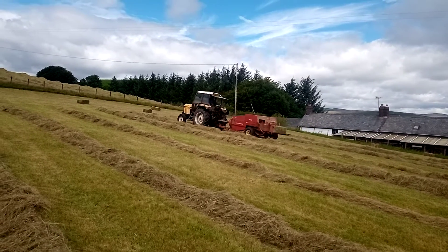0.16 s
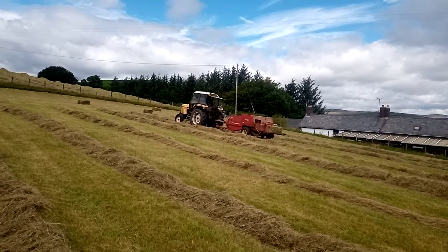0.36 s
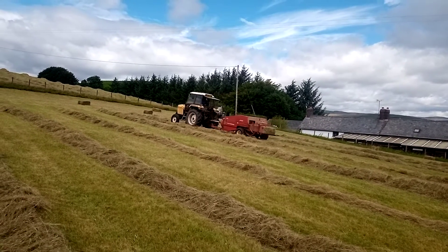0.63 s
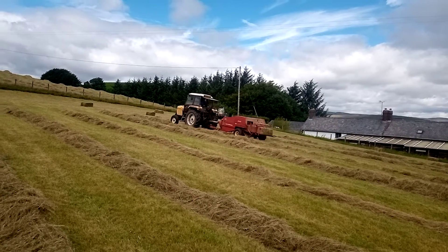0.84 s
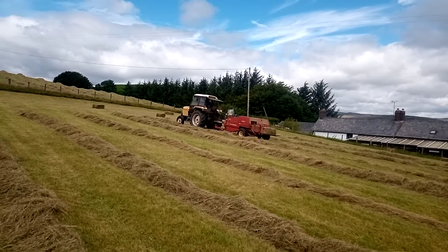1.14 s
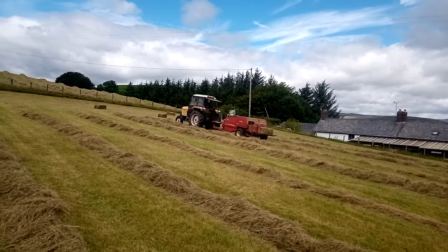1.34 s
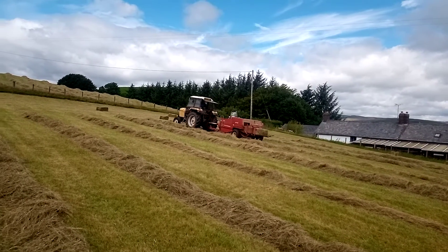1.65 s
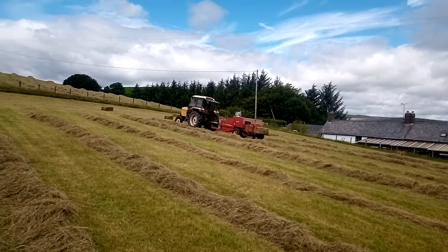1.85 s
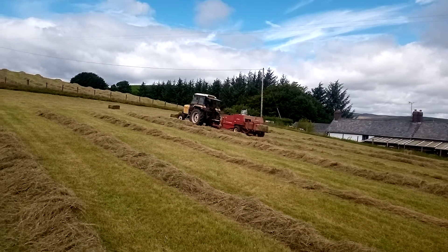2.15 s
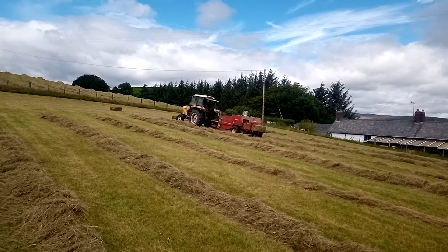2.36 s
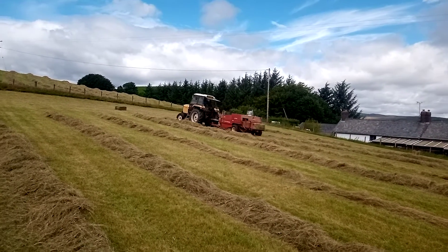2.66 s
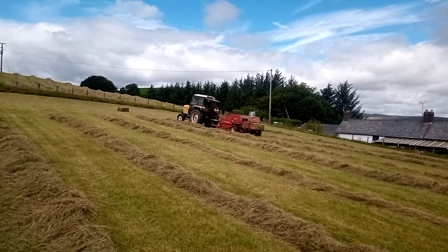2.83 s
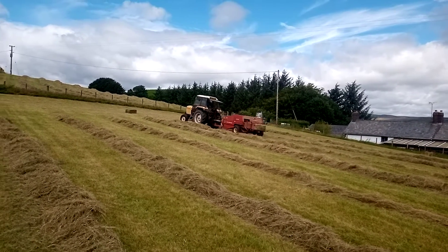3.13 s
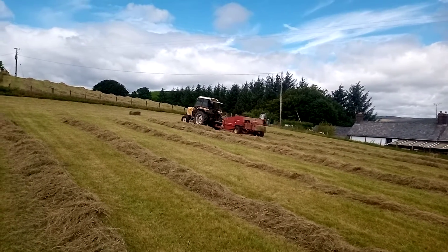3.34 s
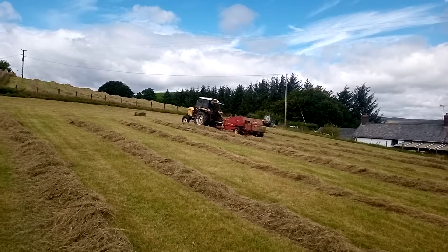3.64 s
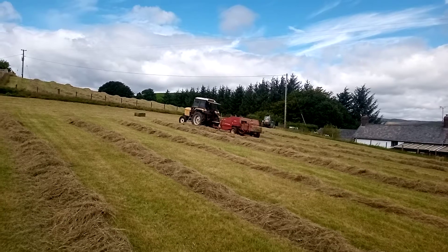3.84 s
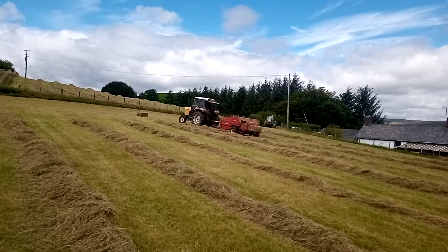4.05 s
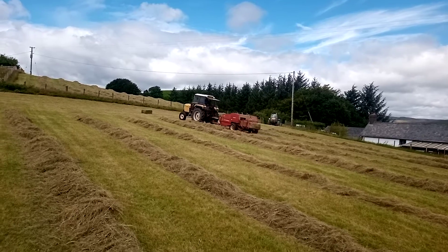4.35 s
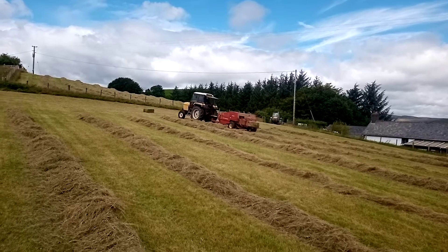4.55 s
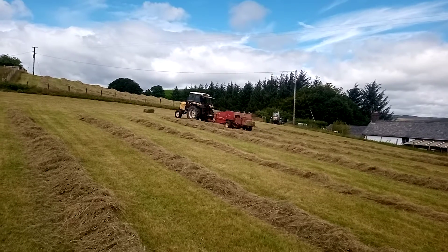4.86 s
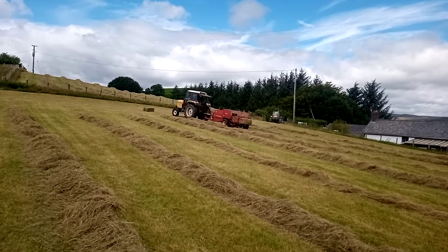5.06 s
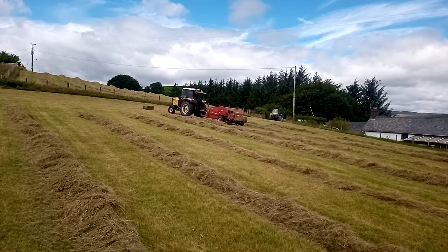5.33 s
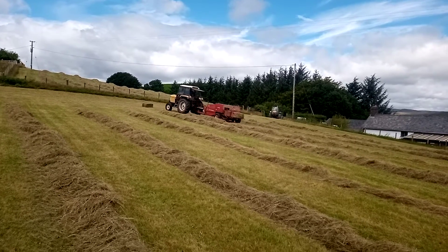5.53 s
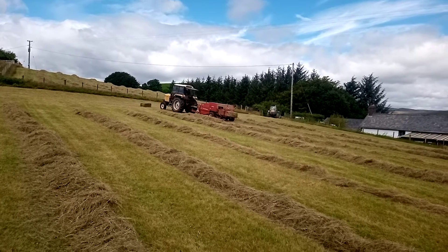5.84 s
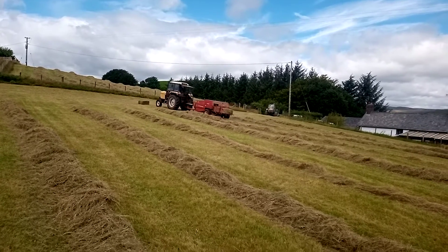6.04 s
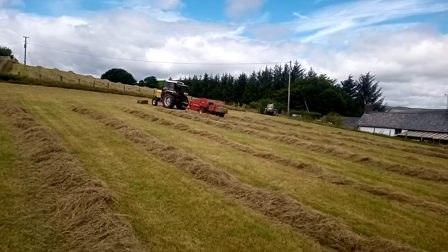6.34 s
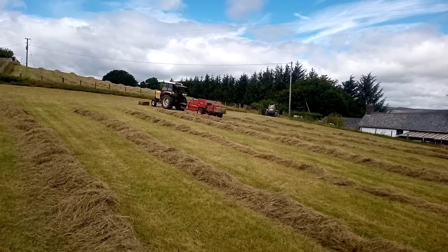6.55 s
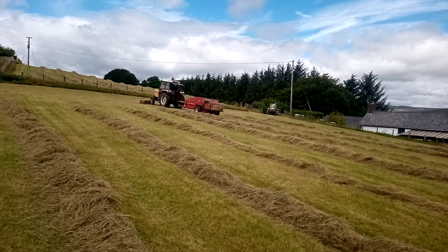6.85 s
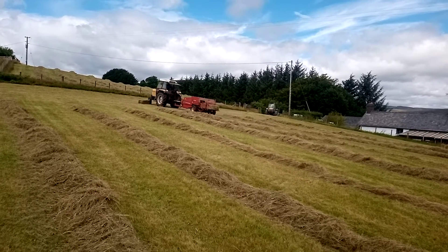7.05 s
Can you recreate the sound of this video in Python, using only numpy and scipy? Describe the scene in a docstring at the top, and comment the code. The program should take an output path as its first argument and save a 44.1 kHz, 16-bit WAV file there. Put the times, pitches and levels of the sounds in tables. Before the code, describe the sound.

Out in a hay field, a baler beats out an even rhythm of metal clanks, with chains jingling and dry stalks crackling in between, over the drone of the diesel tractor towing it. The machines are at a moderate distance and slowly draw away. Soft wind rumbles close on the microphone throughout; late on, after a brief bearing squeak, a strong gust buffets it and dies down.

```python
"""From the start, a four-cylinder diesel tractor hums across a hay field in a light breeze, pulling a
square baler whose tines and chains rattle its steel casing. About every 0.73 s the plunger clanks and
drags the engine down a little; the packer forks then sweep hay in and swing back with a bright clash.
At 4.6 s a dry bearing squeaks. From 5.3 to 6.7 s one strong gust buffets the microphone.
By the end the patter and the top end have faded a little as the baler slowly draws away."""
import sys
import numpy as np
from scipy import signal
from scipy.fft import rfft, irfft
from scipy.io import wavfile
from scipy.ndimage import uniform_filter1d

SR = 44100
rng = np.random.default_rng(int(sys.argv[2]) if len(sys.argv) > 2 else 0)


def store_wav(level_fs):
    """Save 16-bit WAV to argv[1]."""
    pcm = np.round(np.clip(np.atleast_2d(level_fs), -1, 1) * 32767)
    wavfile.write(sys.argv[1], SR, pcm.T.astype(np.int16))


N = 317079
TIME = np.arange(N) / SR


def undb(db):
    """Decibels to gain."""
    return 10 ** (np.asarray(db) / 20)


def unit(x):
    """Scale to rms 1."""
    return x / np.sqrt(np.mean(x ** 2))


def curve(table):
    """Automation lane: rows (t/s, value) joined by straight lines."""
    return np.interp(TIME, *np.transpose(table))


def swell(middle, half_length):
    """Bell-shaped envelope that peaks at 1."""
    return np.exp(-((TIME - middle) / half_length) ** 2)


def since(start):
    """Seconds since start, 0 before it."""
    return np.maximum(TIME - start, 0)


def noise():
    """White noise."""
    return rng.standard_normal(N)


def wander(rate):
    """Random modulator of rms 1, changing about rate times a second."""
    size = max(int(SR / rate), 2)
    steps = np.repeat(rng.standard_normal(N // size + 1), size)[:N]
    return unit(uniform_filter1d(steps, size))


def grainy_noise(depth_db, rate):
    """Noise of rms 1 whose level flickers about rate times a second."""
    return unit(noise() * undb(depth_db * wander(rate)))


def colour(x, points):
    """Minimum-phase EQ through points (f/Hz, level/dB); white noise keeps its level."""
    size = 8192
    hz, db = np.transpose(points)
    bin_hz = np.arange(size // 2 + 1) * SR / size
    log_gain = np.log(undb(np.interp(np.log(bin_hz + 1), np.log(hz), db)))
    cepstrum = irfft(log_gain)[:size // 2]
    cepstrum[1:] *= 2
    response = irfft(np.exp(rfft(cepstrum, size)))
    return signal.fftconvolve(x, response / np.linalg.norm(response))[:N]


def ring(x, modes):
    """Bank of steep resonators (f/Hz, width/Hz, level/dB); white noise keeps its level."""
    out, power = 0, 0
    for hz, width, db in modes:
        b, a = signal.iirpeak(hz, hz / width, fs=SR)
        out = out + undb(db) * signal.lfilter(b, a, signal.lfilter(b, a, x))
        power += undb(db) ** 2 * np.pi * width / 2 / SR
    return out / np.sqrt(power)


# wind strength: a light breeze, then one long gust (t/s, level/dB)
WIND_STRENGTH = [(0, -33.5), (.45, -38), (.75, -41.5), (1.1, -40), (1.45, -46.5), (2.02, -37),
                 (2.65, -40.5), (2.95, -46.5), (3.6, -36), (3.85, -41), (4.48, -46.5), (4.75, -33),
                 (5.08, -41), (5.2, -40), (5.33, -22.5), (5.72, -24), (6.1, -27), (6.7, -27.5), (6.82, -39),
                 (7.19, -31.5)]
# short surges on top of that strength (t/s, half length/s, added level/dB)
WIND_SURGES = [(0.09, 0.042, 3), (0.269, .045, 9.5), (0.547, 0.084, 5.5), (1.68, 0.035, 3.5),
               (2.12, 0.042, 6.5), (2.66, 0.05, 5.5), (3.166, 0.017, 15.5), (4.614, 0.0088, 8),
               (4.722, 0.015, 8.5), (4.87, .02, 5.5), (5.148, 0.024, 14.5), (6.004, 0.057, 5.5),
               (6.524, 0.011, 3.5), (6.94, 0.025, 9)]
# EQ of the breeze's low rumble (f/Hz, level/dB)
RUMBLE_EQ = [(20, -14.5), (35, -28), (55, -8.5), (90, 1), (160, -1), (230, -6.5), (320, -19), (500, -59),
             (1000, -65.5), (8000, -110)]
# EQ of the rougher turbulence in a gust (f/Hz, level/dB)
TURBULENCE_EQ = [(25, -29), (60, -5), (120, 3.5), (200, 2), (340, -1), (480, -9), (700, -17), (1100, -28),
                 (2000, -35.5), (12000, -100)]
# single eddies that slap the microphone (t/s, width/s, peak level/dB)
EDDY_SLAPS = [(5.265, 0.0011, -14.5), (5.329, 0.00034, -17), (5.569, 0.00035, -23), (5.918, 0.0017, -17),
              (5.963, 0.00074, -12)]


def wind(gust_db=-28):
    """Eddies rumble on the microphone; stronger wind breaks into smaller, brighter buffets."""
    surges_db = sum(db * swell(when, half_length) for when, half_length, db in WIND_SURGES)
    strength_db = curve(WIND_STRENGTH) + surges_db - gust_db
    rumble = colour(grainy_noise(depth_db=1.5, rate=30), RUMBLE_EQ)
    buffets = colour(grainy_noise(depth_db=3, rate=110), TURBULENCE_EQ)
    slaps = 0
    for when, width, db in EDDY_SLAPS:
        # one pressure peak between two shallow troughs
        phase = (TIME - when) / width
        slaps = slaps + undb(db) * (1 - phase ** 2) * np.exp(-phase ** 2 / 2)
    return rumble * undb(-28.5 + 0.56 * strength_db) + buffets * undb(-29 + 1.56 * strength_db) + slaps


# governed firing rate of the engine (t/s, f/Hz)
GOVERNED_RATE = [(0, 63.4), (.8, 64.51), (1.55, 63.65), (2.2, 62.75), (2.95, 62.74), (3.5, 62.95),
                 (4.4, 62.7), (5.2, 63.44), (6, 62.8), (7.19, 63.17)]


def firing_rate(sag_hz=0.55, deepest_after_s=0.11):
    """Each plunger stroke loads the engine, and the governor pulls the pitch back up."""
    ages = (since(start) / deepest_after_s for start, *_ in PLUNGER_STROKES)
    load = sum(age * np.exp(1 - age) for age in ages)
    return curve(GOVERNED_RATE) - sag_hz * load


def crank_tones(firings, partials, waver_db, waver_rate, drift_cycles):
    """Partials locked to the crankshaft; moving air makes each waver in level and phase."""
    out = 0
    for multiple, db in partials:
        cycles = multiple * firings + rng.random() + drift_cycles * wander(waver_rate)
        waver = undb(waver_db * wander(waver_rate))
        out = out + undb(db) * unit(np.sin(2 * np.pi * cycles) * waver)
    return out


# partials of the exhaust hum (multiple of the firing rate, level/dB)
EXHAUST_PARTIALS = [(1, -9.5), (1.5, -33), (2, -0.5), (2.5, -15), (3, -17.5), (3.5, -17), (4, -21.5)]
# fader ride on that hum (t/s, level/dB)
EXHAUST_RIDE = [(0, -33.5), (1.2, -35), (2.3, -35.5), (2.7, -31.5), (3.25, -42.5), (4.1, -34), (4.35, -42),
                (4.9, -32), (5.15, -42.5), (6.2, -44.5), (6.75, -33.5), (7.19, -37.5)]
# partials of the block's drone (multiple of the firing rate, level/dB)
DRONE_PARTIALS = [(10, -56.5), (11, -58), (12, -56.5)]
# engine block resonances (f/Hz, width/Hz, level/dB)
BLOCK_MODES = [(694, 181, 5), (762, 65, -3), (986, 155, 4.5), (1860, 680, -4.5)]


def engine(pulse_db=-51, knock_db=-45, knock_decay_cycles=0.91):
    """Each firing thumps the exhaust and rings the block with a rasp of diesel knock."""
    firings = np.cumsum(firing_rate() * (1 + 0.00218 * wander(30))) / SR
    count = firings.astype(int)
    cylinder_db = np.array([0.38, 0, 0.11, -0.28])
    force = undb(cylinder_db[count % 4])
    pulses = np.diff(count, prepend=0) * force
    knock = noise() * force * np.exp(-(firings % 1) / knock_decay_cycles)
    block = ring(undb(pulse_db) * unit(pulses) + undb(knock_db) * unit(knock), BLOCK_MODES)
    hum = crank_tones(firings, EXHAUST_PARTIALS, waver_db=2, waver_rate=18, drift_cycles=0.088)
    drone = crank_tones(firings, DRONE_PARTIALS, waver_db=3.5, waver_rate=11, drift_cycles=0.14)
    return hum * undb(curve(EXHAUST_RIDE)) + drone + block * undb(wander(5.026))


# squeaks of a dry bearing (t/s, length/s, f/Hz, level/dB)
BEARING_SQUEAKS = [(4.624, 0.098, 6040, -51), (4.666, 0.033, 6100, -48), (4.672, .024, 5480, -47)]


def bearing(pitch_wobble=0.0104):
    """Steel rubs on dry steel in brief, unsteady whistles."""
    out = 0
    for start, length, hz, db in BEARING_SQUEAKS:
        arch = np.sin(np.pi * np.clip((TIME - start) / length, 0, 1))
        cycles = np.cumsum(hz * (1 + pitch_wobble * wander(600))) / SR
        out = out + undb(db) * arch * unit(np.sin(2 * np.pi * cycles))
    return out


# ringing modes of the chain links, plus the microphone's high ring near 15 kHz
# (f/Hz, width/Hz, level/dB)
JINGLE_MODES = [(3740, 116, 4), (5024, 100, -1.5), (5660, 130, -4), (6070, 69, 1.5), (6680, 210, -5.5),
                (7220, 120, -14.5), (8550, 72, -15.5), (9040, 130, -18), (9640, 170, -16.5),
                (10480, 210, -19.5), (14707, 260, -23), (15250, 300, -20)]


def jingle(envelope, spread_db=7):
    """Chain links clink: many small touches and a few hard ones ring the same modes."""
    touches = unit(noise() * undb(spread_db * np.clip(wander(250), -2, 2)))
    return ring(touches * envelope, JINGLE_MODES)


# EQ of hay scraping steel, with the microphone's thin resonance near 15 kHz (f/Hz, level/dB)
SCRAPE_EQ = [(300, -21), (700, 6.5), (1200, -14), (2200, 1.5), (3500, -3), (6000, -4.5), (7000, -4),
             (8000, -12.5), (10000, -16.5), (11800, -26.5), (13800, -31), (14900, -14), (16000, -25.5)]


def scrape(excitation):
    """Hay rubs on steel with a broad, dry tone; the microphone adds a thin ring on top."""
    return colour(excitation, SCRAPE_EQ)


# resonances of the baler's steel casing (f/Hz, width/Hz, level/dB)
CASING_MODES = [(973, 207, 0.5), (1423, 133, -0.5), (1776, 131, 2.5), (2010, 380, 5), (2600, 600, 0),
                (3097, 220, -4.5), (3782, 144, -5.5), (4230, 73, -7.5), (4850, 330, -9), (5380, 270, -11.5),
                (6040, 330, -10.5), (6490, 310, -10.5)]


def casing(excitation):
    """The steel casing rings with whatever rattles against it."""
    return ring(excitation, CASING_MODES)


def tine_ticks(envelope, per_s=45, decay_s=0.0035, spread_db=3):
    """Single tines flick the pickup bands at random: short dry ticks of uneven size."""
    flicks = (rng.random(N) < per_s / SR) * undb(spread_db * np.clip(noise(), -2, 2))
    bursts = signal.lfilter([1], [1, -np.exp(-1 / (decay_s * SR))], flicks)
    return scrape(unit(noise() * bursts) * envelope)


# rattles on every turn of the flywheel (t/s from the plunger's impact, half length/s, level/dB)
FLYWHEEL_RATTLES = [(-.138, 0.016, -55), (-.025, 0.045, -56.5), (.025, .03, -48), (.135, 0.0073, -46.5)]


def feeder_envelope(pickup_db=-49.5, fade_db_per_s=0.62, packer_delay_s=0.21, packer_half_s=0.047):
    """Pickup patter fades with distance; each stroke adds rattles and a sweep as big as its wad of hay."""
    power = undb(pickup_db - fade_db_per_s * TIME) ** 2
    for start, _, _, _, packer_db, *_ in PLUNGER_STROKES:
        for delay, half_length, db in [*FLYWHEEL_RATTLES, (packer_delay_s, packer_half_s, packer_db)]:
            power = power + undb(db) ** 2 * swell(start + delay, half_length)
    return np.sqrt(power)


def feeder():
    """Tines and chains patter on the casing while dry stalks crackle through the chute."""
    effort = feeder_envelope() * undb(0.43 * wander(45))
    tines = undb(5.5) * effort * grainy_noise(depth_db=3, rate=900)
    stalks = undb(-4) * effort * grainy_noise(depth_db=1, rate=220)
    chains = undb(-49) * grainy_noise(depth_db=3, rate=300)
    clinks = undb(-8) * jingle(effort)
    ticks = undb(-9) * tine_ticks(effort)
    return casing(tines + chains) + scrape(stalks) + clinks + ticks


def fork_sweep(delay_s=0.25, half_length_s=0.04, lowpass_hz=3200):
    """Once a stroke the packer forks push hay into the chamber: a duller swell of rattling."""
    envelope = sum(swell(start + delay_s, half_length_s) for start, *_ in PLUNGER_STROKES)
    rattle = casing(noise() * envelope)
    return undb(-41) * signal.lfilter(*signal.butter(2, lowpass_hz, fs=SR), rattle)


def fork_return(attack_s=0.016, release_s=0.04, highpass_hz=2500):
    """Half a stroke after the impact the forks swing back with a bright, jingling clash."""
    envelope = 0
    for start, *_, delay, db in PLUNGER_STROKES:
        age = since(start + delay)
        envelope = envelope + undb(db) * (1 - np.exp(-age / attack_s)) * np.exp(-age / release_s)
    chatter = envelope * unit(undb(3 * wander(400)))
    sizzle = signal.lfilter(*signal.butter(1, highpass_hz, "high", fs=SR), scrape(noise() * chatter))
    return undb(4) * casing(noise() * chatter) + undb(5.5) * sizzle + undb(-2) * jingle(envelope)


# resonances of the bale chamber's heavy frame (f/Hz, width/Hz, level/dB)
FRAME_MODES = [(1801, 68, 2), (1920, 51, 5), (2583, 74, 1.5), (2680, 145, 0), (3084, 110, -2.5),
               (3770, 190, -11)]
# plunger strokes, which also cue the forks, feeder and engine sag (t/s, impact level/dB,
# rebound level/dB, treble trim/dB, packer level/dB, fork return delay/s, fork return level/dB)
PLUNGER_STROKES = [(0.225, -29.5, -29, -0.5, -48.5, 0.36, -38), (0.956, -28.5, -36.5, -3, -52, 0.36, -44),
                   (1.689, -27.5, -26, -2, -43.5, 0.39, -44), (2.424, -26, -31.5, -3.5, -45, 0.38, -46),
                   (3.163, -25, -33, -5.5, -46, 0.38, -46), (3.896, -28.5, -30, -10, -46.5, 0.37, -45),
                   (4.623, -29, -34, -1, -51, 0.38, -47), (5.369, -32, -48, 0.5, -46.5, 0.34, -43.5),
                   (6.099, -27, -28, -3.5, -45.5, .356, -38.5), (6.842, -29, -28.5, -2.5, -44.5, 1, -50)]


def plunger(rebound_s=0.01896, settle_s=0.0406, attack_s=0.0012, crack_s=0.0065, rattle_s=0.022):
    """The plunger hits, its linkage rebounds, then settles: three knocks ring the frame and casing."""
    body_power, treble_power = np.zeros(N), np.zeros(N)  # overlapping knocks add in power
    for start, impact_db, rebound_db, treble_db, *_ in PLUNGER_STROKES:
        knocks = [(0, impact_db, treble_db),
                  (rebound_s, rebound_db, treble_db - 3),
                  (settle_s, impact_db - 13, treble_db)]
        for delay, db, trim_db in knocks:
            first = int((start + delay) * SR)
            age = TIME[:min(SR // 4, N - first)]
            decay = np.exp(-age / crack_s) + undb(-12) * np.exp(-age / rattle_s)
            envelope = undb(db) * (1 - np.exp(-age / attack_s)) * decay
            body_power[first:first + len(age)] += envelope ** 2
            treble_power[first:first + len(age)] += (envelope * undb(trim_db)) ** 2
    body, treble = np.sqrt(body_power), np.sqrt(treble_power)
    chatter = unit(undb(0.36 * wander(500)))
    rattle = undb(1) * casing(noise() * chatter * body)
    clank = undb(-2) * ring(noise() * chatter * body, FRAME_MODES)
    crunch = undb(-5) * scrape(noise() * chatter * treble)
    return rattle + clank + crunch + undb(-10) * jingle(treble)


def baler(shelf_hz=10500, shelf_start_db=1, air_loss_db_per_s=0.95):
    """All the baler's layers, heard through more and more air: a high shelf slowly closes."""
    mix = bearing() + feeder() + fork_sweep() + fork_return() + plunger()
    top_end = signal.filtfilt(*signal.butter(2, shelf_hz, "high", fs=SR), mix)
    shelf_gain = undb(shelf_start_db - air_loss_db_per_s * TIME)
    return mix + top_end * (shelf_gain - 1)


def scene():
    """Wind close by, tractor and baler some way off in the open field; mono."""
    return (wind() + engine() + baler())[None]


def record(dry, ceiling=0.45, lowpass_hz=15850):
    """The microphone soft-clips the hardest wind peaks, and a steep low-pass cuts the top."""
    rounded = ceiling * np.tanh(dry / ceiling)
    return signal.sosfilt(signal.ellip(10, .2, 80, lowpass_hz, fs=SR, output="sos"), rounded)


dry = scene()
out = record(dry)
store_wav(out)
```